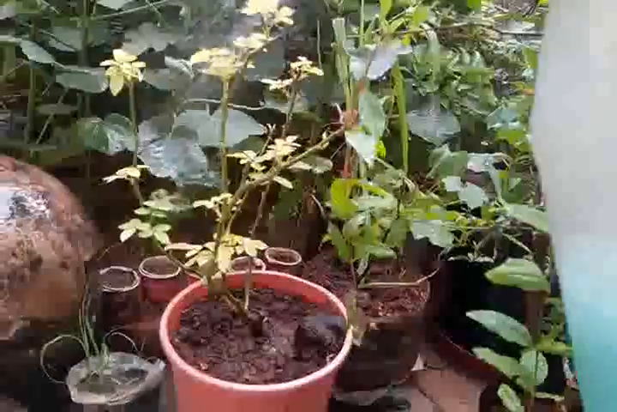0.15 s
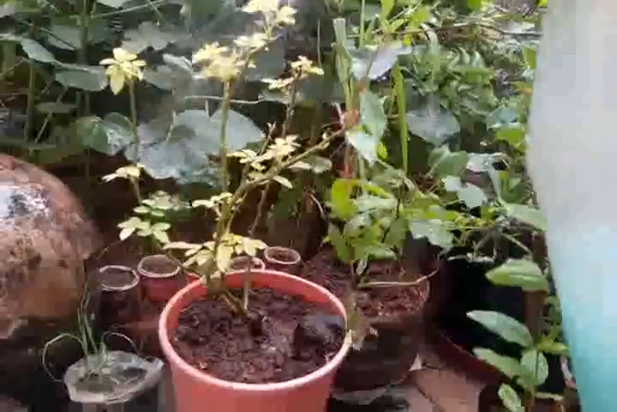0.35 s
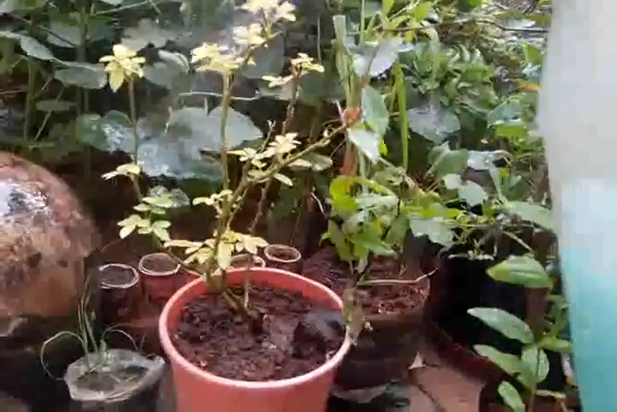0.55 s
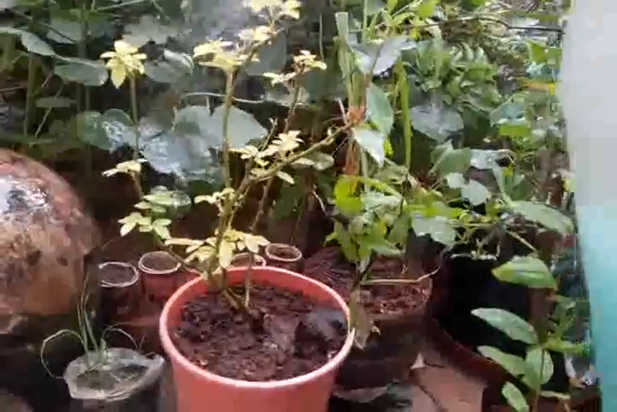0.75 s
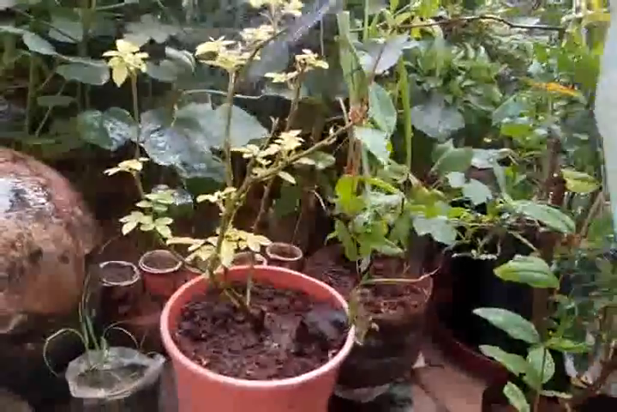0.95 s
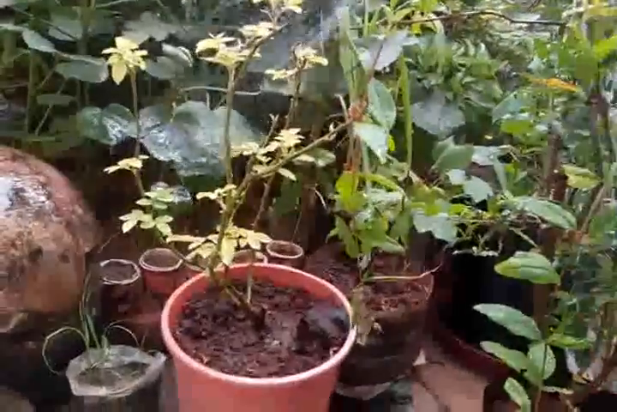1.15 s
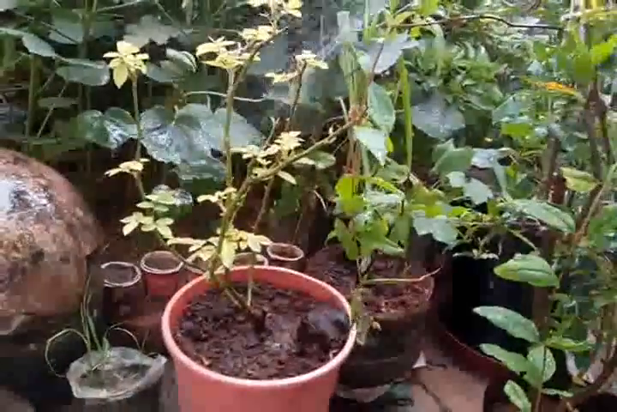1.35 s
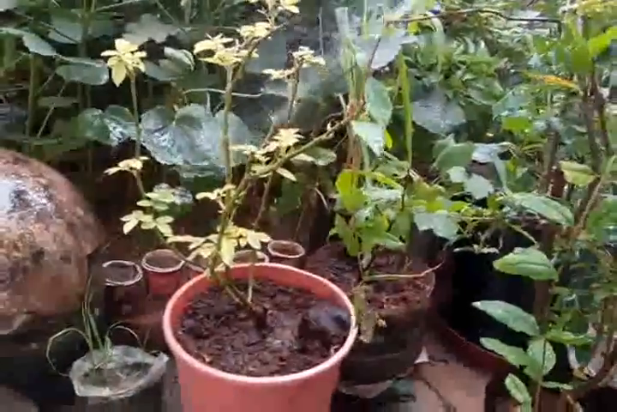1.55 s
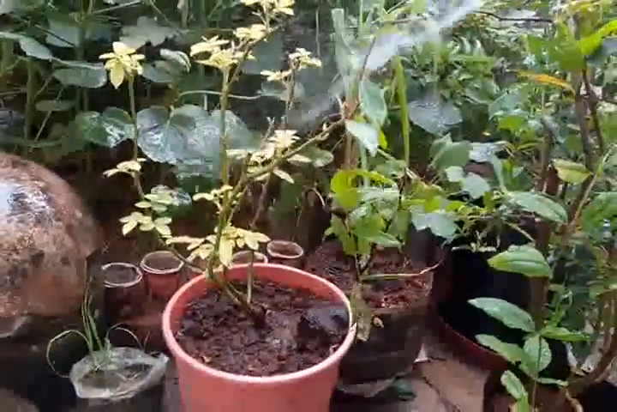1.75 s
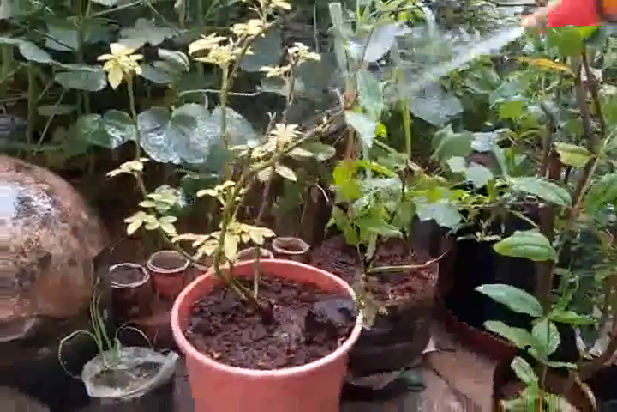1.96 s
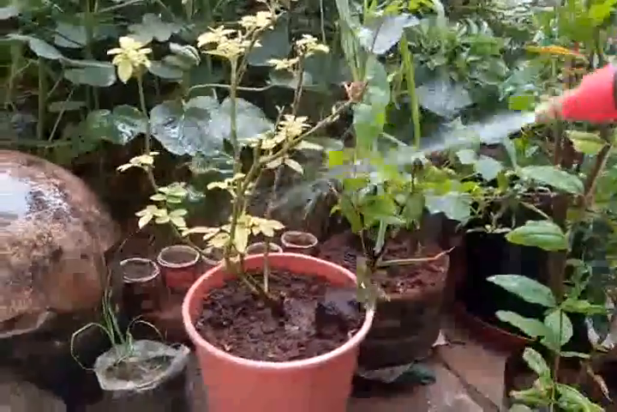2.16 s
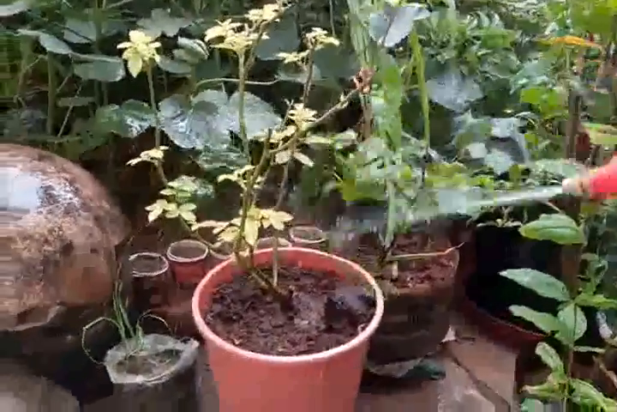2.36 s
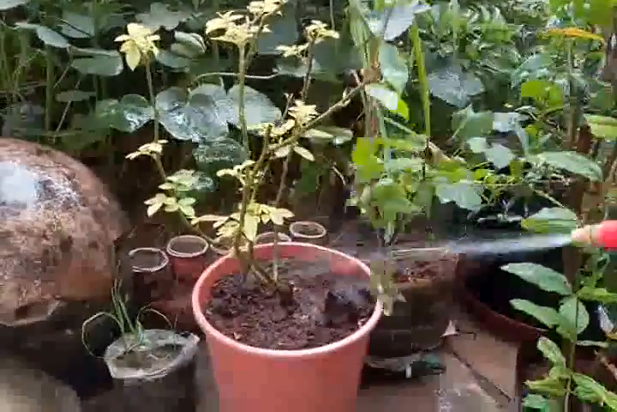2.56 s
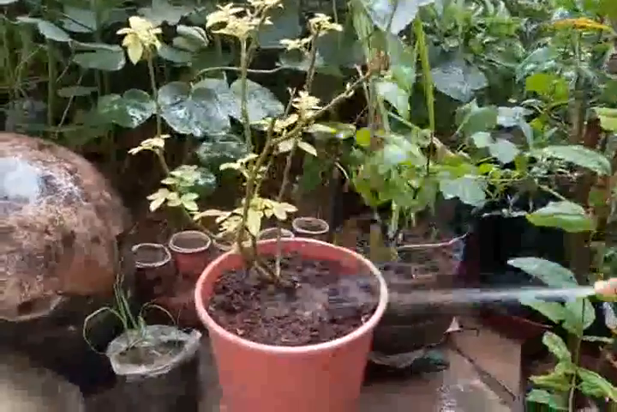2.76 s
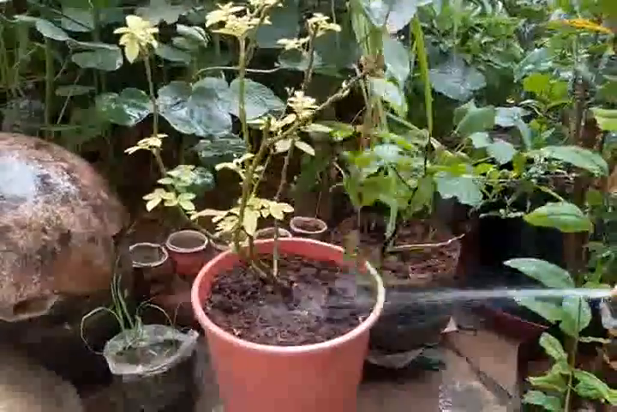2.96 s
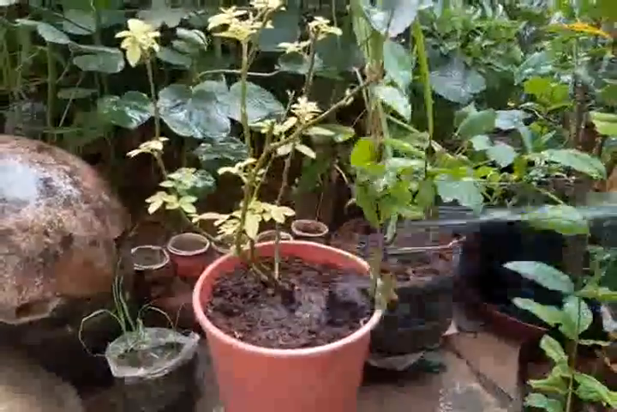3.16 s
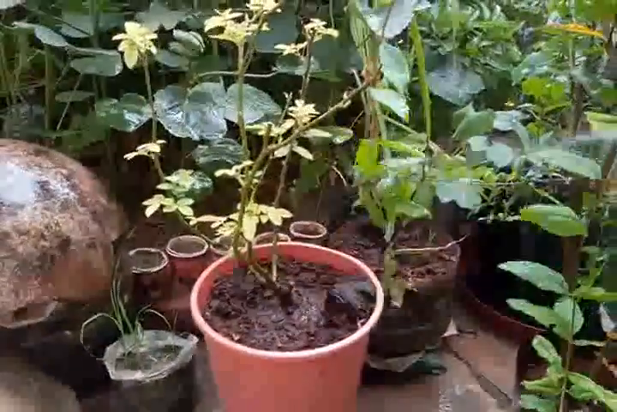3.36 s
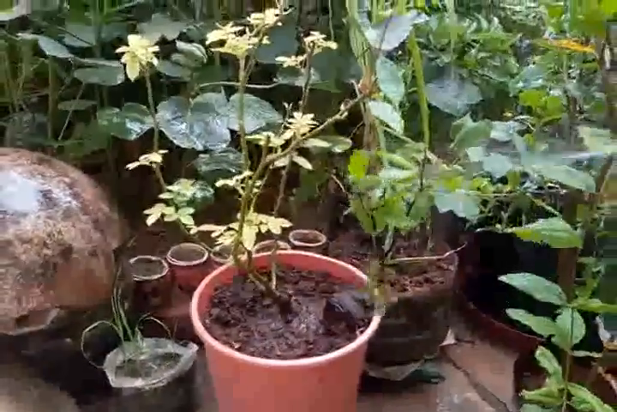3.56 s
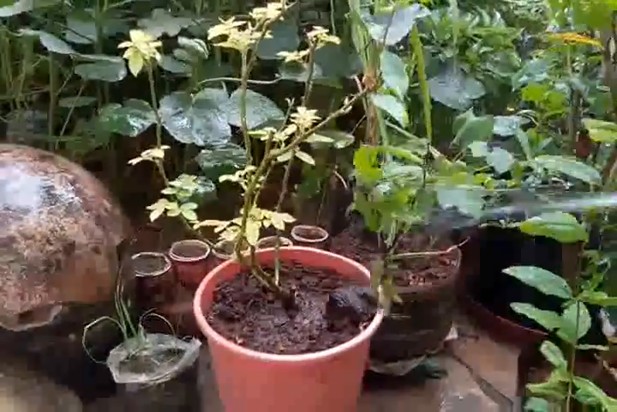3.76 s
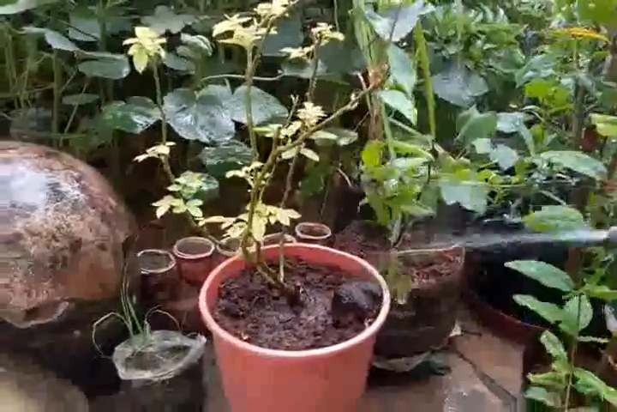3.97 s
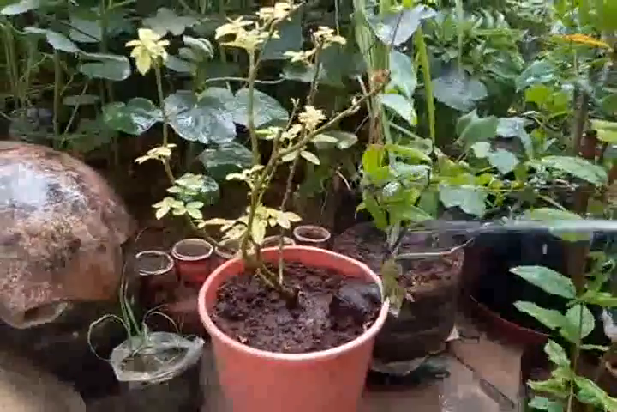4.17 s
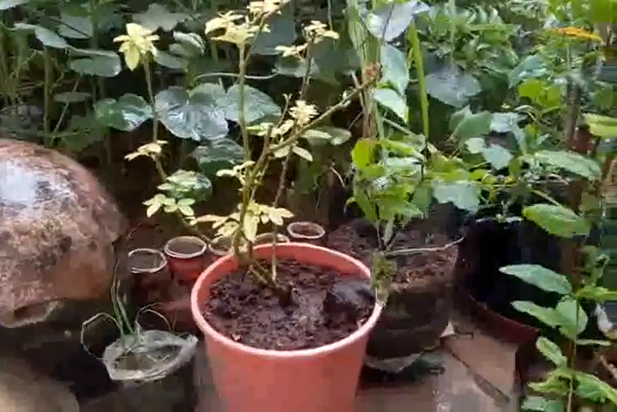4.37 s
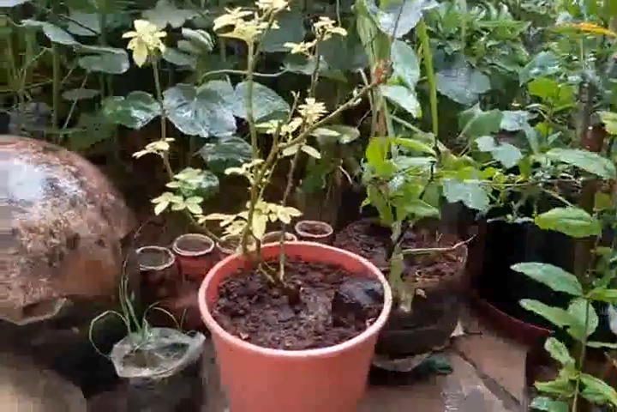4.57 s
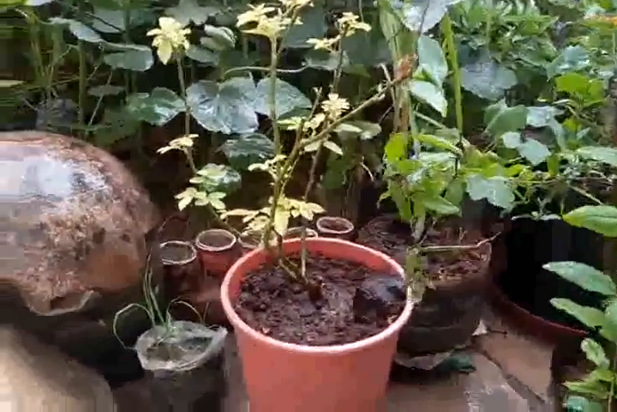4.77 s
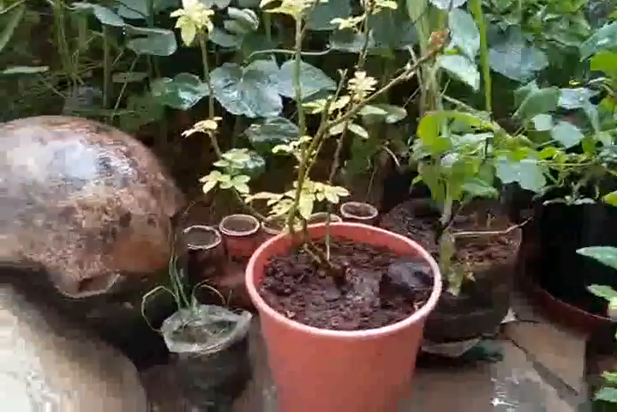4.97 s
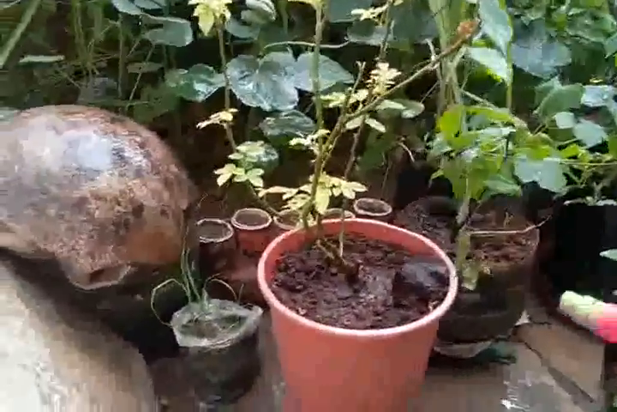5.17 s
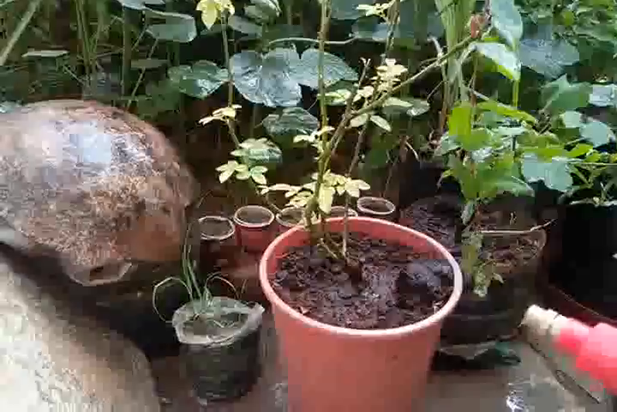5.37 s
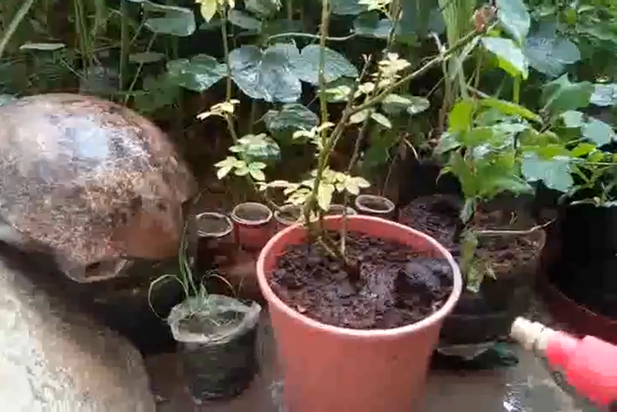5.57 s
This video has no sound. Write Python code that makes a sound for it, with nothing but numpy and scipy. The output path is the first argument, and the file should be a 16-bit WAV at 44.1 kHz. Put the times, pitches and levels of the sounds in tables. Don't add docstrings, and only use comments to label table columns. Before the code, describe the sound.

Close outdoor stereo pickup of a hand sprayer wetting potted plants. Bright, uneven mist hisses and surges while drops patter on leaves, stems and soil, with sharp water splats. Just after four seconds the jet fades to little spits and drips, then the plastic trigger and tank knock lightly. Faint yard air and a low distant engine throb lie underneath.

```python
import sys
import numpy as np
from scipy import signal
from scipy.fft import rfft, irfft
from scipy.io import wavfile
from scipy.ndimage import map_coordinates

SR = 44100
rng = np.random.default_rng(int(sys.argv[2]) if len(sys.argv) > 2 else 0)


def boost(x):
    u = np.asarray(x, float) / 20
    return 10 ** u


def to_wav(sig):
    pcm = np.clip(np.atleast_2d(sig), -1, 1) * 32767
    pcm = np.round(pcm).astype(np.int16)
    wavfile.write(sys.argv[1], SR, pcm.T)


N = 248283

# start_s, mist_db, coarse_db (over the mist),
# pan_db (left over right), stray_db (stray drops over the mist)
FLOW = [(0, -47.5, -6, 1.5, -9.5), (.42, -44.5, 0.5, 2.5, -3), (.53, -46.5, -10, 1.5, -8.5),
        (.92, -47, -3.5, 0.5, -12.5), (1.02, -43.5, -3, 0, -8), (1.22, -49, -7, -0.5, -13),
        (1.5, -46, -3.5, 0, -7), (1.75, -45.5, -6.5, 0, -10.5), (1.99, -39.5, -5, 0.5, -11.5),
        (2.14, -45, -3, .6, -17.5), (2.3, -47, -7, 1.5, -16), (2.47, -42.5, -4, 4.5, -4.5),
        (2.52, -45, -15, 1, -11), (2.66, -47, -23, -2, -15.5), (3.0, -43.5, -26, -1, -21.5),
        (3.24, -48, -9, -0.3, -18.5), (3.6, -41.5, -12.5, 1, -23.5), (4.27, -53, -17.5, 0.5, -14.5)]
# start_s, length_s, mist_db, pan_db
SURGES = [(.24, 0.014, -50, -3), (.46, .012, -44, 1), (.78, 0.011, -52, 1.2), (.975, .012, -41.5, 1),
          (1.235, 0.0069, -65, 3), (1.508, 0.051, -45.5, 1.2), (1.97, 0.031, -45, -5),
          (2.24, 0.023, -37.5, -3.5), (2.375, 0.0096, -42, -2), (2.46, 0.014, -39.5, -4),
          (2.54, .015, -56, 0), (2.585, 0.052, -44, .3), (2.72, 0.013, -51.5, 8), (2.77, .012, -48.5, -5),
          (2.815, 0.036, -45.5, 6), (2.99, 0.046, -44, 0.5), (3.07, 0.099, -49, -1), (3.56, 0.013, -54, -3),
          (3.648, 0.0098, -47, -5), (3.697, 0.01, -43, 3), (3.775, 0.083, -46, 5.5), (3.94, .015, -41, 2),
          (4.015, 0.0069, -51, 2), (4.065, 0.08, -47, 0), (4.193, 0.0058, -45.5, 1.2)]
# start_s, length_s, mist_db, pan_db
DRIBBLES = [
    (4.464, 0.035, -63, -8),
    (4.505, 0.023, -59.5, -9),
    (4.606, 0.079, -69.5, -8),
    (4.889, .004, -76, 3),
    (4.924, 0.0053, -60, -3),
    (4.94, 0.036, -72, -3),
    (4.985, .01, -66.5, -7.5),
    (5.01, 0.035, -71, -3),
]
# pitch_hz, level_db (per Hz)
MIST = [(2500, -38), (5000, -22), (7000, -11.5), (9000, -3.5), (10300, 1.5), (11400, -6.5), (12000, -14),
        (15000, -13), (16000, -75)]
# pitch_hz, level_db (per Hz)
SPRAY = [(1500, -15), (3000, -1.5), (4000, 6), (6000, 5), (7500, 2.5), (10000, 5), (14000, -29)]

# low_hz, high_hz, ring_cycles, drops_per_s, pan_db
SURFACES = [
    (2660, 3120, 13.7, 2000, 3),
    (1547, 2370, 18.5, 1600, 1.5),
    (992, 1418, 37, 1400, 0),
    (288.6, 835, 42, 400, -7.5),
]
# pitch_hz, level_db
LEAVES = [(280, -1.5), (380, 1), (520, 3), (680, -40.5), (780, 8), (1050, 5), (1220, 10.5), (1400, -4.5),
          (1850, -2.5), (2300, -3.5), (3000, 20.5), (3350, 12.5)]
# time_s, left_lead_samples
BEARING = [
    (0, 13),
    (1.2, 6.1),
    (2.5, 7.6),
    (3.4, 2.7),
    (5.63, 2.9),
]
# start_s, length_s, level_db, size (0 stem, 1 small leaf, 2 large leaf)
PASSES = [(.002, 0.011, -49.5, 1.27), (0.227, 0.27, -49, 0.65), (0.318, 0.19, -49.5, 2.25),
          (0.605, 0.048, -60, 1.3), (0.854, 0.0052, -47.5, 0.42), (0.909, 0.14, -49.5, 2),
          (0.924, 0.084, -51.5, 0.88), (1.014, 0.022, -49, .1), (1.311, 0.29, -54.5, 2.28),
          (1.454, 0.087, -46.5, 1.6), (1.496, 0.24, -49, 0.62), (1.607, 0.16, -54, 2),
          (1.832, 0.21, -46.5, 2.24), (1.85, 0.21, -50, 0.19), (2.327, 0.13, -45.5, 0.042),
          (2.343, 0.077, -52, 2), (2.397, 0.067, -40.5, 0.26), (2.57, 0.038, -52.5, 0.43),
          (2.998, 0.0077, -52, 2.53), (3.174, 0.02, -50, 0.046), (3.294, 0.048, -54, 0.58),
          (3.416, 0.0043, -49, 0.22), (3.41, 0.021, -48, 2.33), (3.486, 0.0074, -51, 0.42),
          (3.525, 0.094, -43, 1.46), (3.598, .025, -52, .05), (3.671, 0.0092, -47.5, 1),
          (3.717, 0.0058, -39, 0.7), (3.751, 0.1, -47.5, 0.56), (3.71, 0.086, -42.5, 2.7)]
# start_s, length_s, level_db, size (as in PASSES)
FALLS = [
    (4.281, 0.0069, -53, 1.9),
    (4.6, 0.0024, -54, 0.2),
    (4.195, .003, -61, 0.056),
    (4.462, 0.011, -61.5, 1.8),
    (5.7, 0.0066, -78, 0.79),
    (4.922, 0.0073, -58, 1.93),
]
# start_s, length_s, level_db
POT = [(0.418, 0.033, -59), (0.925, 0.027, -65), (1.47, 0.17, -63), (1.915, 0.021, -58.5),
       (2.016, 0.044, -50), (2.634, 0.039, -61.5), (2.804, 0.14, -72), (3.422, 0.014, -54),
       (3.667, 0.0076, -54.5), (3.715, 0.044, -51), (4.63, 0.038, -68)]
STRAY_DB = [-3, -0.84, -9]

# pitch_hz, level_db (per Hz)
YARD = [(20, -19), (50, -4), (100, 3), (200, -5.5), (400, -18.5), (800, -20.5), (2000, -26.5), (7000, -33),
        (10300, -27.5), (12000, -32.5), (16000, -40)]
# pitch_hz, likeness (-1 to 1)
LIKENESS = [(60, -0.85), (180, -0.97), (550, -0.27), (1650, 0.17), (4970, -0.032), (15000, 0.039)]
# time_s, firings_hz
FIRING_HZ = [
    (0, 11.546),
    (2.1, 11.546),
    (2.8, 11.504),
    (3.5, 11.547),
    (5.63, 11.547),
]
# multiple (of the firing rate), level_db
ORDERS_DB = [(5, -17), (6, -20), (7, 0), (8, -1), (9, -3), (10, -10), (11, -16), (12, -17), (13, -18),
             (15, -6), (17, -16), (21, -15)]

# start_s, peak_db, pan_db, body_db (dull body
SPLATS = [(0.2374, -20.5, 2.5, -13.5), (0.353, -29, -6, -11), (0.4545, -28, 5, -13), (0.78, -29, -6, -20),
          (0.856, -37, -5, -8), (0.9014, -30.5, 1, -15), (0.9363, -26.5, 4, -14), (0.974, -22, 4, -27),
          (1.031, -38, 0, -1), (1.0917, -34, 0.0, -14), (1.1537, -42, -2, -23), (1.2369, -29, 3, -38),
          (1.29, -31, -2.5, -12), (1.5117, -25, -2, -15.5), (1.6333, -31, -2.0, -12),
          (1.905, -31.5, -4, -9), (1.976, -20.5, -5, -31), (2.1071, -32.5, -4, -14), (2.1796, -24, -4, -38),
          (2.224, -31, 0, -31), (2.24, -29, 0, -27), (2.2613, -25.5, 0, -22), (2.3186, -32, -2, -16),
          (2.3573, -26.5, -1, -11), (2.3809, -20.5, 2, -19), (2.464, -30, -10, -10), (2.552, -32, 0, -18),
          (2.591, -29.5, -1.5, -22), (2.6127, -29, 0.0, -29), (2.692, -37, -6, -22),
          (2.7232, -25.5, -7, -27), (2.754, -28, -1, -34), (2.7747, -23.5, 1, -37), (2.8042, -31, 0.0, -23),
          (2.818, -22, -1.5, -29), (2.852, -33, -2.5, -21), (2.9464, -29.5, -1.5, -33),
          (2.9959, -26, -1.5, -34), (3.0297, -33, -5, -36), (3.09, -38, -2.5, -25), (3.2979, -31, -4, -16),
          (3.469, -29, -2, -33), (3.5142, -27.5, -3, -28), (3.5483, -29.5, 1, -25), (3.5843, -30, -3, -19),
          (3.6495, -17, -2, -35), (3.6935, -31.5, 1, -12.5),
          (3.7815, -28, -3, -21),
    (3.8013, -28.5, -2, -14),
    (3.9464, -29.5, -4, -18),
    (3.833, -33, -4, -15),
    (3.862, -36, -2, -14),
    (3.985, -35, -5, -28),
    (4.0198, -28, -7, -42),
    (4.087, -32, -7, -29),
    (4.169, -43, -1.5, -28),
    (4.1967, -28.5, 1, -29),
]
# start_s, peak_db, pan_db, body_db
DRIPS = [
    (4.2632, -36, -9, -14),
    (4.47, -42, -15, -13),
    (4.5272, -42.5, -12, -10),
    (4.6059, -52.5, -11, -22),
    (4.72, -53, -7, -18.5),
    (4.8888, -48.5, -4, -29),
    (4.9253, -43, -5, -14.5),
    (4.965, -48, 6, -6.5),
    (5.006, -41, -13, -16),
]
# pitch_hz, level_db (per Hz)
BODY = [(400, -25), (900, -5.5), (2000, -0.5), (4500, -4.5), (7000, -15), (12000, -15.5)]

# start_s, peak_db, pan_db, rattle_s, treble_db (over the body)
KNOCKS = [(5.133, -44.5, -4.5, 0.012, -19), (5.244, -68, 0, 0.013, 10), (5.266, -63, -7, 0.011, 7),
          (5.2747, -59.5, -1, 0.0065, 17.5), (5.36, -40, 1.5, 0.025, -7.5), (5.369, -39, 3, 0.0069, -16),
          (5.379, -42, 1, 0.0084, -4.5), (5.39, -26.5, -1, 0.0076, -33), (5.406, -36.5, 1, 0.0076, -35),
          (5.442, -49, 5, 0.024, -20), (5.47, -56, 5, 0.005, 6), (5.481, -47.5, -2, 0.0099, -26),
          (5.502, -45.5, 3, 0.011, -23), (5.517, -46, -5, 0.0098, -20), (5.535, -51, 3, 0.011, -22)]
# pitch_hz, level_db, t60_s
TANK = [(382, -2, 0.16), (630, -5, 0.039), (822, 2, 0.1), (1063, 8.5, 0.079), (1380, 0, 0.078),
        (1520, 4, 0.03), (1840, -14, 0.025), (2224, -14, 0.02), (3060, -7, 0.03), (3400, -16, 0.012)]
# pitch_hz, level_db (per Hz)
TRIGGER = [(2000, -11.5), (4000, -7), (5600, -7.5), (6400, 2.5), (7200, -7.5), (9500, -2), (11400, -9.5),
           (12500, -34), (16000, -33)]

# middle_s, half_length_s
DROPOUTS = [
    (.675, .03),
    (1.04, .012),
    (2.65, .02),
    (2.91, .028),
    (3.53, .045),
    (3.75, .028),
]
# middle_s, half_length_s
UPPER_DROPOUTS = [(.12, .07), (.38, .07), (.53, .02), (.63, .05), (.85, .03), (1.05, .025), (1.2, .015),
                  (1.44, .15), (2.1, .03), (2.2, .03), (2.53, .04), (2.66, .04), (2.93, .04), (3.13, .07),
                  (3.36, .05), (3.53, .05), (3.76, .03), (3.98, .07), (4.19, .06)]
BAND_EDGES_HZ = [135, 245, 350, 470, 600, 760, 950, 1300]


def rms_one(x):
    return x / np.sqrt(np.mean(x ** 2) + 1e-20)


def in_time(rows):
    s, *columns = np.transpose(rows)
    return [np.interp(np.arange(N) / SR, s, c) for c in columns]


def at_hz(points, hz):
    points_hz, values = np.array(points).T
    return np.interp(np.log(hz + 1), np.log(points_hz), values)


def panned(pan_db):
    return boost(np.array([pan_db / 2, -pan_db / 2]))


def drift(rate):
    r = np.exp(-40 * np.pi * rate / SR)
    slow = signal.lfilter([1], [1, -2 * r, r * r], rng.standard_normal(N // 20 + 2002))[2000:]
    return np.interp(np.arange(N) / 20, np.arange(len(slow)), rms_one(slow))


def colour(x, spectrum):
    size = 4096
    cepstrum = irfft(at_hz(spectrum, np.arange(size // 2 + 1) * SR / size) * np.log(10) / 20)
    cepstrum[1:size // 2] *= 2
    cepstrum[size // 2 + 1:] = 0
    response = irfft(np.exp(rfft(cepstrum)))
    return signal.oaconvolve(x, response[None] / np.linalg.norm(response), axes=1)[:, :N]


def bandpass(x, low_hz, high_hz):
    return signal.sosfilt(signal.butter(2, [low_hz, high_hz], "band", fs=SR, output="sos"), x)


def ring(clicks, hz, t60):
    r, w = boost(-60 / (t60 * SR)), 2 * np.pi * hz / SR
    return signal.lfilter([0, np.sin(w)], [1, -2 * r * np.cos(w), r * r], clicks + 1e-18)


def drops(per_s, spread_db, clump_db):
    born = rng.random(N) < per_s * boost(clump_db * drift(25)) / SR
    return born * boost(spread_db * np.minimum(rng.exponential(1, N), 5))


def bursts(impacts, fade_s):
    r = np.exp(-1 / (max(fade_s, 1e-4) * SR))
    return signal.lfilter([1], [1, -r], impacts + 1e-18) * rng.standard_normal((2, N))


def swells(start_s, length_s, level_db, rise, fall):
    t = np.arange(0, N + 32, 32)[:, None] / SR
    early_s = np.maximum(start_s - t, 0)
    late_s = np.maximum(t - start_s - np.abs(length_s), 0)
    db = level_db - rise * early_s - fall * late_s
    return np.interp(np.arange(N) / SR, t[:, 0], np.sqrt(np.sum(boost(db) ** 2, axis=1)))


def flow():
    mist_db, *rest = in_time(FLOW)
    since_let_go_s = np.maximum(np.arange(N) / SR - FLOW[-1][0], 0)
    return mist_db - 115 * since_let_go_s, *rest


def spurts(rows, rise, fall):
    s, length_s, level_db, pan_db = np.transpose(rows)
    return np.array([swells(s, length_s, level_db + side * pan_db / 2, rise, fall) for side in (1, -1)])


def fizz():
    puffs, count = bursts(drops(1400, spread_db=3.6, clump_db=4.0), fade_s=0.0004), 7
    size = np.repeat(rng.integers(0, count, N // 32 + 1), 32)[:N]
    pitches_hz = np.geomspace(6500, 11500, count)
    return rms_one(sum(ring(puffs * (size == k), hz, 21.0 / hz) for k, hz in enumerate(pitches_hz)))


def jet():
    mist_db, coarse_db, pan_db, _ = flow()
    steady = boost(mist_db) * panned(pan_db)
    surge = spurts(SURGES, rise=249, fall=345)
    dribble = spurts(DRIBBLES, rise=692, fall=193)
    sputter_db = 1.37 * drift(12.5) + 0.2 * drift(23)
    crackle = rms_one(bursts(drops(900, spread_db=7.0, clump_db=4.5), fade_s=0.0015))
    patter = rms_one(bursts(drops(900, spread_db=1.0, clump_db=4.0), fade_s=0.012))
    fine = boost(-19.0) * crackle + boost(-10.0) * fizz() + boost(-4.0) * rng.standard_normal((2, N))
    coarse = boost(-8.0) * crackle[::-1] + boost(-11.0) * patter + rng.standard_normal((2, N))
    fine = colour(fine, MIST) * (np.hypot(steady, surge) + dribble)
    coarse_level = np.hypot(boost(coarse_db) * steady, boost(-10.5) * surge) + boost(-9.5) * dribble
    coarse = colour(coarse, SPRAY) * coarse_level
    return boost(2.5 + sputter_db) * (fine + boost(1.15 * drift(16)) * coarse)


def struck():
    mist_db, _, _, aim_db = flow()
    pass_rates, fall_rates = (900, 290), (1500, 377)   # rise, fall in dB per s

    def on_size(rows, k, rates):
        s, length_s, db, size = np.transpose(rows)
        return swells(s, length_s, db - 12.5 * np.abs(size - k), *rates)

    levels = []
    for k, stray_db in enumerate(STRAY_DB):
        hit = on_size(PASSES, k, pass_rates) + on_size(FALLS, k, fall_rates)
        levels.append(np.hypot(hit, boost(mist_db + aim_db + stray_db)))
    pot = np.hypot(swells(*np.transpose(POT), *pass_rates), boost(mist_db - 22.5))
    return levels + [pot]


def foliage():
    out, count, now = np.zeros((2, N)), 9, np.arange(N)
    for level, (low_hz, high_hz, cycles, per_s, pan_db) in zip(struck(), SURFACES):
        hits = drops(per_s, spread_db=2.5, clump_db=4.5) * rng.choice([-1, 1], N)
        leaf, direct, echo = rng.integers(0, count, N), 0, 0
        for k, hz in enumerate(np.geomspace(low_hz, high_hz, count)):
            note = boost(at_hz(LEAVES, hz)) * np.sqrt(hz) * ring(hits * (leaf == k), hz, cycles / hz)
            direct = direct + note
            echo = echo + 0.64 * np.roll(note, int(rng.uniform(60.0, 401.6)))
        late = map_coordinates(direct - echo, [now - in_time(BEARING)[0]], order=3, mode="nearest")
        layer = bandpass([direct + echo, late], 0.67 * low_hz, 1.39 * high_hz)
        out += boost(1.5) * level * panned(pan_db)[:, None] * rms_one(layer)
    return out


def yard():
    common, apart = rfft(rng.standard_normal((2, N)))
    alike = np.clip(-at_hz(LIKENESS, np.arange(len(common)) * SR / N), -1, 1)
    mid, side = irfft([np.sqrt((1 + alike) / 2) * common, np.sqrt((1 - alike) / 2) * apart], N)
    return boost(-56.5 + 0.27 * drift(3.3)) * colour(np.array([mid + side, mid - side]), YARD)


def engine():
    turn = 2 * np.pi * np.cumsum(in_time(FIRING_HZ)[0]) / SR
    turn -= turn[int(4.897 * SR)]
    hum = sum(boost(db) * np.cos(k * turn + 4.4) for k, db in ORDERS_DB)
    hum = boost(-58.5 + 1.8 * drift(6)) * rms_one(hum)
    return hum * panned(-4.5)[:, None]


def splats():
    s, peak_db, pan_db, body_db = np.transpose(SPLATS + DRIPS)
    at, pan_db = (s * SR).astype(int), np.clip(pan_db, -4, 4)
    bright, dull = np.zeros((2, 2, N))
    bright[:, at] = boost(peak_db - 1.0) * panned(pan_db)
    dull[:, at] = boost(peak_db + body_db + 4.0) * panned(pan_db)
    bright += 0.4 * np.roll(bright, round(0.0016 * SR), axis=1)
    click = 0.78 * bright * [[1], [-0.6]]
    bright = bandpass(click + bursts(bright, fade_s=0.0012), 6500, 12500)
    return colour(bright, MIST) + colour(bursts(dull, fade_s=0.0013), BODY)


def knocks():
    force, scrape = np.zeros((2, 2, N))
    start = int(KNOCKS[0][0] * SR)
    for s, peak_db, pan_db, length_s, treble_db in KNOCKS:
        at = int(s * SR)
        fade = panned(pan_db)[:, None] * np.exp(-np.arange(N - at) / SR / max(length_s, 0.001))
        force[:, at:] += boost(peak_db - 18.5) * fade
        scrape[:, at:] += boost(peak_db + treble_db + 0.5) * fade ** 1.12
    out = colour(scrape * rng.standard_normal((2, N)), TRIGGER)
    soft = signal.butter(2, 1500, fs=SR, output="sos")
    first = (np.array(KNOCKS)[:, 0] * SR).astype(int) - start
    shape = (2, N - start)
    for hz, level_db, t60 in TANK:
        contacts = (rng.random(shape) < 900 / SR) * rng.standard_normal(shape)
        blows = rng.uniform(0.6, 1.8, len(KNOCKS)) * rng.choice([-1, 1])
        contacts[:, first] = blows * np.array([[1], [-1]])
        contacts[1] = 0.5 * contacts[0] + 1.56 * contacts[1]
        push = signal.sosfilt(soft, force[:, start:] * contacts)
        out[:, start:] += boost(level_db) * ring(push, hz, 0.59 * min(t60, 0.07))
    return out


def scene():
    return jet() + foliage() + yard() + engine() + splats() + knocks()


def shut(rows):
    s, half_s = np.transpose(rows)
    t = np.arange(0, N + 32, 32) / SR
    gates = np.clip((np.abs(t[:, None] - s) - half_s) / 0.015, 0, 1)
    return np.interp(np.arange(N) / SR, t, np.prod(gates, axis=1))


def roll_off(x):
    return signal.sosfilt(signal.butter(12, 15400, fs=SR, output="sos"), x)


def record(dry):
    loud = np.arange(N) / SR < 4.3
    unlike = rfft((dry[0] - dry[1]) / 2)
    band = np.searchsorted(BAND_EDGES_HZ, np.arange(len(unlike)) * SR / N)
    kept = [boost(np.minimum(0, 12 * drift(9) + 12) * loud) * shut(DROPOUTS)]
    kept += [shut(UPPER_DROPOUTS) * shut(DROPOUTS)]
    kept += [boost(np.minimum(0, 16 * drift(7) + 10) * loud) for _ in BAND_EDGES_HZ[2:]]
    lost = sum(irfft(unlike * (band == k), N) * (1 - gate) for k, gate in enumerate(kept))
    filtered = dry - lost * [[1], [-1]]
    return roll_off(filtered * [[1], [-1]])


dry = scene()
out = record(dry)
to_wav(out)
```